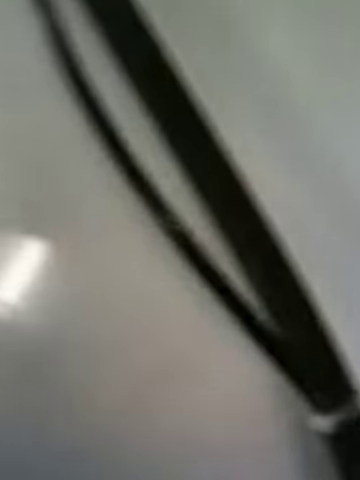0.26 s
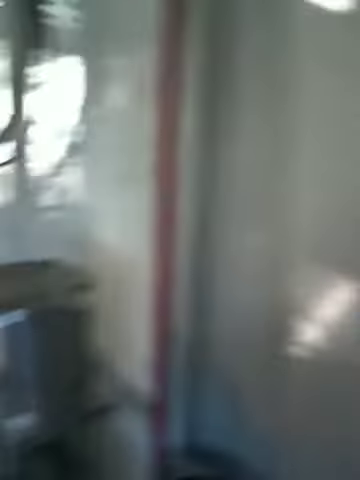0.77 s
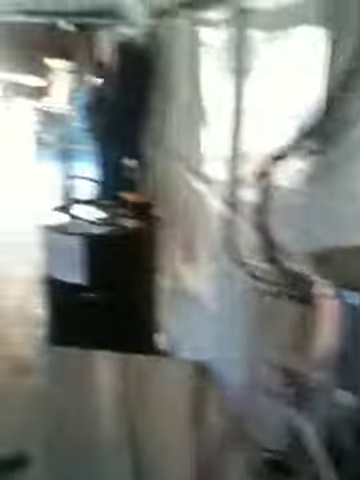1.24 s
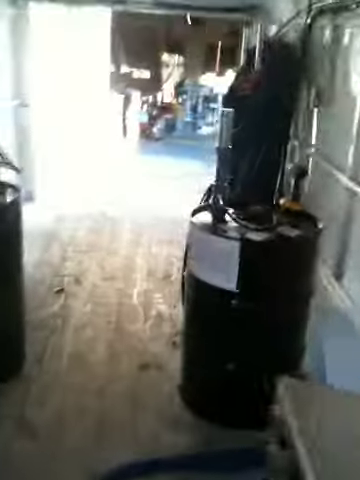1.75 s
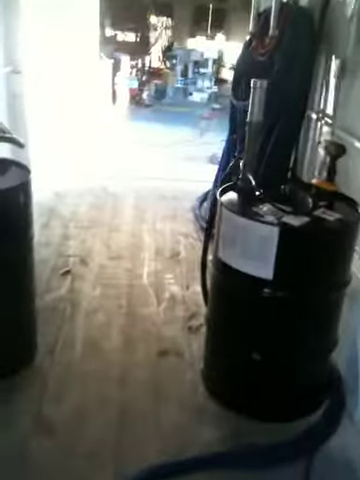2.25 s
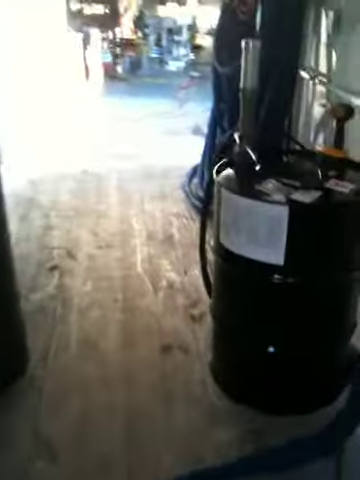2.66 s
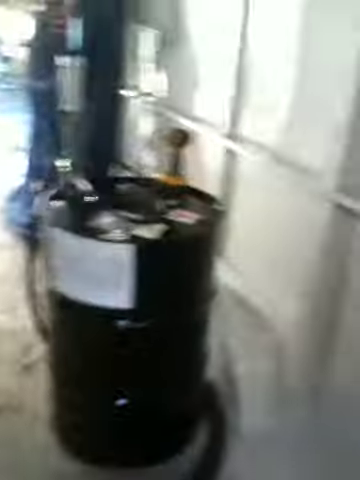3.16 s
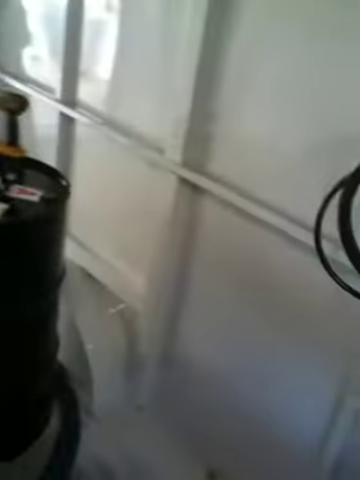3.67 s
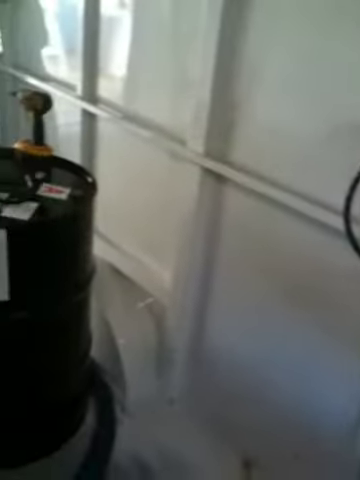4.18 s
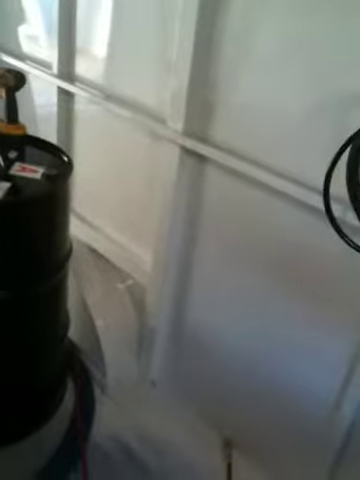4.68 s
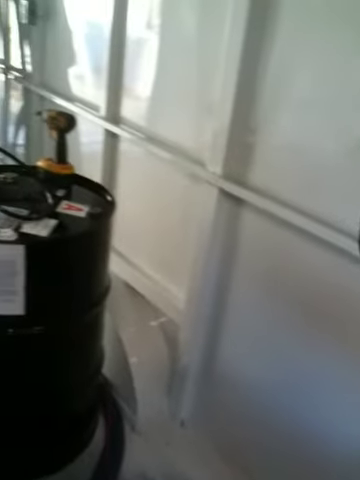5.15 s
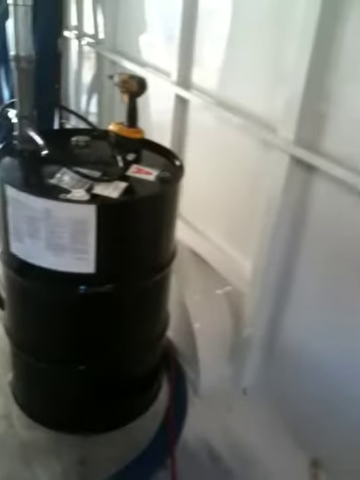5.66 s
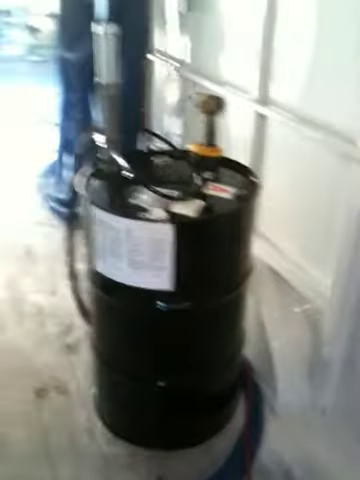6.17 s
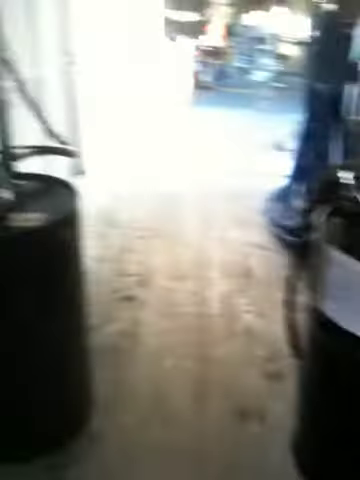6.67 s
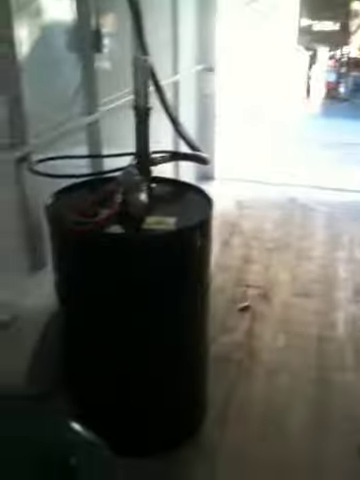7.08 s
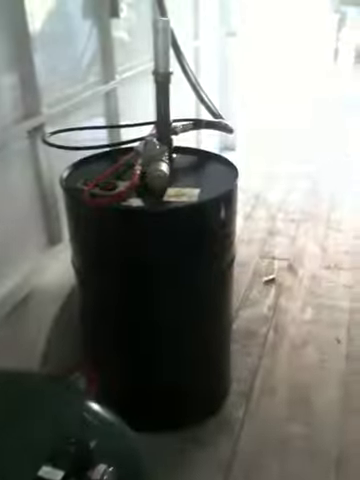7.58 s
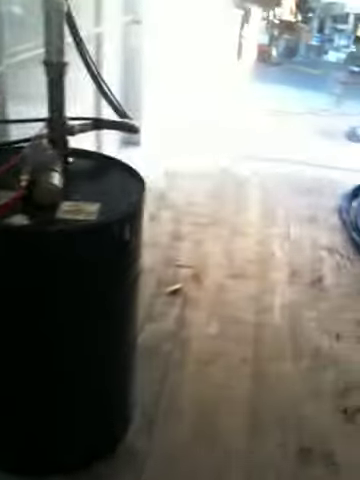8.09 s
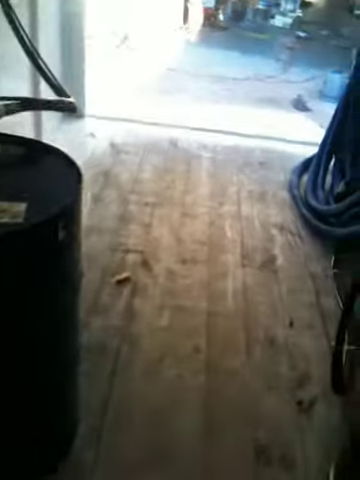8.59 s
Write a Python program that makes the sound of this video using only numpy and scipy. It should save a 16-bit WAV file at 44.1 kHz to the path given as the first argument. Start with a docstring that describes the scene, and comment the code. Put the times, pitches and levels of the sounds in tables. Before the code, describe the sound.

A diesel engine drives a piston air compressor and fan inside a hard-walled trailer. It begins as a loud, bright, rattling roar that overloads a small handheld microphone. Just before two seconds it drops abruptly, bursts back, drops again, returns for a moment around three seconds, then remains a much quieter, muffled hum with a faint pulsing valve hiss.

```python
"""A diesel engine drives a piston air compressor and a fan by belt beside a hard-walled trailer.
Engine and compressor are sums of shaft orders, the fan sums blade tones; shaped noise adds rush and valve hiss.
The din switches between loud and bright, overloading the input, and quiet and dull,
a hum with a trace of valve hiss. The signal also dips out briefly three times."""
import sys
import numpy as np
from scipy import signal
from scipy.fft import rfft, irfft
from scipy.io import wavfile
from scipy.ndimage import uniform_filter1d, map_coordinates

SR = 44100
rng = np.random.default_rng(int(sys.argv[2]) if len(sys.argv) > 2 else 0)


def store_wav(level_fs):
    """Save 16-bit WAV to argv[1]."""
    pcm = np.round(np.clip(np.atleast_2d(level_fs), -1, 1) * 32767)
    wavfile.write(sys.argv[1], SR, pcm.T.astype(np.int16))


N = 389382

# Engine speed, one cycle being two crank turns. Each row: time in seconds, cycle rate in Hz.
SPEED = [(0, 15.04), (.75, 15.048), (1.5, 15.004), (2, 15.003), (2.5, 15.02), (3.4, 14.982), (4, 15.0),
         (4.5, 15.002), (5, 15.02), (6, 15.043), (7, 15.031), (8, 15.016), (8.83, 15.005)]
CYCLE_HZ = SPEED[0][1]  # the rate at the start, used to place orders on the frequency axis
PUMP_RATIO = .8376  # compressor turns per engine cycle


def gain_of(db):
    """Level law: decibels to an amplitude factor."""
    return 10 ** (np.asarray(db) / 20)


def evened(x):
    """Normalization: scales to rms 1."""
    return x / np.sqrt(np.mean(x ** 2) + 1e-20)


def read(points, hz):
    """Spectral envelope: interpolates a curve on a log-frequency axis."""
    f, value = np.transpose(points)
    return np.interp(np.log(hz + 1), np.log(f + 1), value)


def columns(table, t):
    """Time-varying control: interpolates every column of a table at the times t."""
    s, *cols = np.transpose(table)
    return [np.interp(t, s, c) for c in cols]


def band_rms(x, lo_hz, hi_hz):
    """Parseval's theorem: rms of one band from its spectrum."""
    hz = np.fft.rfftfreq(len(x), 1 / SR)
    band = rfft(x)[(hz > lo_hz) & (hz < hi_hz)]
    return np.linalg.norm(band) * np.sqrt(2) / len(x)


def tilted(x, curves, shares):
    """Time-varying filtering: a level for all bins, plus each further curve by its share over frequency."""
    hz, t, z = signal.stft(x, SR, nperseg=256)
    level_db, *tilts_db = curves(t)
    db = level_db + sum(np.outer(read(share, hz), tilt) for share, tilt in zip(shares, tilts_db))
    return signal.istft(z * gain_of(db), SR, nperseg=256)[1][:N]


def rush(spectrum, patchy_db):
    """Broadband noise: Gaussian bins under a spectral envelope, with drifting patches, rms 1."""
    frames, hz = N // 512 + 5, np.fft.rfftfreq(2048, 1 / SR)
    real, imag, patches = rng.standard_normal((frames, len(hz), 3)).T
    patches = uniform_filter1d(patches, size=14, axis=0)  # smooth over frequency
    patches = evened(uniform_filter1d(patches, size=8, axis=1))  # smooth over time
    db = read(spectrum, hz)[:, None] + patchy_db * patches
    z = (real + 1j * imag) * gain_of(db)
    return evened(signal.istft(z, nperseg=2048, noverlap=1536)[1][:N])


def drone(turns, orders, wander_db, drift):
    """Fourier series at shaft speed; the level and phase of each order wander slowly."""
    k, db = np.transpose(orders)
    step, size = 2048, 4096  # samples between wave shapes, points in one shape
    noise = rng.standard_normal((2, N // step + 2, len(k)))
    wander, slip = uniform_filter1d(noise, size=8, axis=1)
    phase = 2 * np.pi * rng.random(len(k)) + drift * np.cumsum(evened(slip), axis=0)
    spectra = np.zeros((len(phase), size // 2 + 1), complex)
    spectra[:, np.round(k).astype(int)] = gain_of(db + wander_db * evened(wander)) * np.exp(1j * phase)
    waves = irfft(spectra) * size / np.sqrt(2)
    waves = np.hstack([waves, waves[:, :1]])  # close the turn for interpolation
    return map_coordinates(waves, [np.arange(N) / step, turns % 1 * size], order=1)


def fan(cycles):
    """Blade passing: harmonics of the blade rate, which swell and sink a little."""
    # Blade tones. Each row: multiple of the blade rate, level in dB.
    blade_tones = [(1, -3), (2, -11), (3, -18), (4, -23)]
    blade_passes = 22.745 * cycles
    swell = rng.standard_normal((len(blade_tones), N))
    swell = evened(uniform_filter1d(swell, size=SR // 3, axis=1))
    return sum(gain_of(db + 3.2 * s) * np.sqrt(2) * np.sin(2 * np.pi * k * blade_passes)
               for (k, db), s in zip(blade_tones, swell))


def compressor(cycles, wander_db, drift):
    """Periodic pumping: a harmonic series on the compressor crank."""
    # Crank orders. Each row: multiple of the crank rate, level in dB.
    crank_orders = [(7, -21), (8, -19), (9, -11), (10, -18), (13, -5), (14, -12), (15, -16), (16, -12),
                    (17, -17), (19, -13), (20, -7), (21, -3), (25, -13), (26, -5), (28, -10), (29, -14),
                    (32, -16), (33, -17), (34, -11), (35, -18), (39, -16), (40, -17), (41, -14), (50, -18),
                    (53, -21), (59, -20)]
    return drone(cycles * PUMP_RATIO, crank_orders, wander_db, drift)


def valves(turns):
    """Modulated flow noise: puffs of air at fixed places of each turn, over a steady leak, of uneven strength."""
    # Valve puffs. Each row: place in the turn (0-1), level in dB, decay in turns.
    puffs = [(.855, 0, .1), (.105, 1, .11), (.29, -10, .1)]
    # Hiss spectrum. Each row: frequency in Hz, density in dB per Hz.
    hiss_spectrum = [(7000, -25), (10400, -21), (11500, 2), (12600, 7), (13400, -14), (14200, 2.5),
                     (15300, 1.5), (16500, -18)]
    flow = np.full(N, .3)
    strength = gain_of(1.2 * rng.standard_normal((int(turns[-1]) + 3, len(puffs))))
    for i, (place, db, decay) in enumerate(puffs):
        since = turns - place + 1
        attack = np.minimum(since % 1 / 0.015, 1)
        shape = np.exp(-(since % 1) / decay) * attack
        flow += gain_of(db) * shape * strength[since.astype(int), i]
    return evened(flow * rush(hiss_spectrum, patchy_db=1.5))


def panel_ring(x):
    """Resonance: a panel rings near 1.75 kHz by a varying amount."""
    # Ring over time. Each row: time in seconds, level in dB, ring in dB before its share.
    ring = [(0, 0, 0.5), (.9, 0, -0.5), (1.3, 0, 2.5), (1.9, -0.5, 2), (2.3, 0, 5), (3.3, 0, 4.5),
            (4, 0, 0)]
    # Resonance shape. Each row: frequency in Hz, share of the ring.
    resonance = [(1450, -0.075), (1740, 0.95), (2100, -0.23), (2500, -0.092)]
    return tilted(x, lambda t: columns(ring, t), [resonance])


def muffling(t, top=False):
    """Attenuation: the loss in dB falls steadily as the sound brightens, jumps as it dulls, then grows on."""
    # Bright spells. Each row: fully bright in seconds, fall of the loss in dB per second before it,
    # start of dulling in seconds, quick part in seconds, fade from that start in dB per second,
    # delay of the top in seconds.
    spells = [(-1, 9000, 1.784, 0.021, 300, 0), (1.9314, 9003, 2.652, 0.038, 203, 0.00098),
              (3, 335, 3.13, 0.022, 165, 0.011)]
    quick_db = 12.5  # quick loss as the sound dulls
    bright, speed, dull, quick, fade, lag = np.transpose(spells)[:, :, None]
    after = np.maximum(t - dull, 0)
    brightening_loss = speed * np.maximum(bright + top * lag - t, 0)
    dulling_loss = quick_db * np.minimum(after / quick, 1) + fade * after
    return (brightening_loss + dulling_loss).min(axis=0)


def bright_colour(t):
    """Spectral shading: the bright colour less the muffling, and how far bass and top are shifted (0-1)."""
    # Colour while bright. Each row: time in seconds, level in dB, then bass, bite and treble shifts
    # in dB before their shares.
    colour = [(0, -15, -0.5, 2, 0.5), (.3, -13, -1.5, -1.5, 0), (.7, -14, -0.5, 3.5, -2),
              (1.3, -13, -1, 1, -2), (1.77, -13.5, 0.5, 6, 0), (1.96, -14, 1, 2.5, -1),
              (2.09, -13.5, 2, 2.5, 0), (2.15, -14, 2.5, 9.5, 1), (2.45, -13.5, 2.5, 11, -2.5),
              (2.58, -12, -0.5, 9.5, -6.5), (2.66, -13, 3, -2, -12.5), (3, -13.5, 2, 7, 4.5),
              (3.06, -17.5, 3.5, -1, 4), (3.13, -14.5, 3.5, 3, 3)]
    level_db, *shifts_db = columns(colour, t)
    loss_db = muffling(t)
    spared = np.minimum(loss_db / 13.5, 1)  # full at a loss of 13.5 dB
    dulled = np.minimum(muffling(t, top=True) / 9.5, 1)  # full at a loss of 9.5 dB
    return [level_db - loss_db, *shifts_db, spared, dulled]


def engine_orders(weak, strong, count):
    """Order spectrum: a scattered smooth level from the fourth order up, with the strong ones set in."""
    k = np.arange(4, count + 1)
    scatter = 3 * rng.uniform(-0.91, 1, len(k)) * np.sqrt(3)  # dB
    db = read(weak, k * CYCLE_HZ) + scatter
    return sorted({**dict(zip(k, db)), **dict(strong)}.items())


def bright_engine(cycles, bright_orders, dull_orders):
    """Order spectrum in two balances: the order levels change at 1.9 s."""
    # Dull balance against bright. Each row: frequency in Hz, level in dB before 4.5 dB more.
    dull_balance = [(75, 7), (170, 0.5), (300, -2), (500, -6.5), (900, -7), (1300, -17), (1750, -13)]
    change_s = 1.9
    later_orders = [(k, db - read(dull_balance, k * CYCLE_HZ) - 4.5) for k, db in dull_orders]
    later_orders += [row for row in bright_orders if row[0] > later_orders[-1][0]]
    before = drone(cycles, bright_orders, wander_db=3.0, drift=0.095)
    after = drone(cycles, later_orders, wander_db=3.5, drift=0.092)
    return np.where(np.arange(N) < change_s * SR, before, after)


def dull_hum(cycles, hiss, dull_orders):
    """Low-frequency emphasis: the quiet, dull mix of all sources, with a trace of valve hiss."""
    # Dull rush and rattle. Each row: frequency in Hz, density in dB per Hz.
    rush_spectrum = [(30, -36), (60, -22), (160, -7), (350, -6), (450, -11.5), (1100, -11), (1350, -23),
                     (1700, -16.5), (2300, -19), (3200, -20), (4300, -25), (7000, -28), (10600, -40),
                     (12300, -41.5), (16000, -46)]
    # Hum over time. Each row: time in seconds, hum level in dB, treble shift in dB before its share,
    # valve hiss level in dB.
    hum_levels = [(1.83, -29, -5, -66), (2.8, -30.5, -4, -63), (3.3, -31, -2.5, -69), (4.1, -34, 0.5, -66),
                  (6.2, -34.5, 0.9, -66), (7.1, -35, 2, -60), (7.5, -34.5, 1.5, -59), (8.3, -35, 1.1, -65),
                  (8.83, -35, 1.1, -67.5)]
    hum = gain_of(4.5) * rush(rush_spectrum, patchy_db=0.44)
    hum = hum + drone(cycles, dull_orders, wander_db=2.5, drift=0.034)
    hum = hum + compressor(cycles, wander_db=-0.2, drift=0.026)
    hum = panel_ring(hum + fan(cycles))
    hum = hum / band_rms(hum, 100, 1200)
    treble = [(1200, 0.064), (2500, 0.53)]  # (Hz, share)
    hum = tilted(hum, lambda t: columns(hum_levels, t), [treble])
    hiss_db = columns(hum_levels, np.arange(N) / SR)[-1]
    return hum + gain_of(hiss_db) * hiss


def bright_din(cycles, hiss, bright_orders, dull_orders):
    """Broadband radiation: the loud, bright mix of all sources, whose bass, bite and treble shift."""
    # Bright rush and rattle. Each row: frequency in Hz, density in dB per Hz.
    rush_spectrum = [(25, -31), (64, -25), (100, -17), (150, -16), (250, 0), (480, -4), (900, -6.5),
                     (1300, -5.5), (2000, -5), (2400, -5.5), (3150, -4), (4600, -12.5), (8000, -15),
                     (12000, -19.5), (16000, -28)]
    # Bass spared by the muffling. Each row: frequency in Hz, gain in dB at full effect.
    spared = [(350, 12), (700, 6), (1300, 2)]
    # Top dulled by the muffling. Each row: frequency in Hz, gain in dB at full effect.
    dulled = [(2000, 0.5), (2700, -4.5), (5000, -12), (8000, -19)]
    din = gain_of(13.5) * rush(rush_spectrum, patchy_db=1.5)
    din = din + bright_engine(cycles, bright_orders, dull_orders)
    din = din + gain_of(-4) * fan(cycles)
    din = din + gain_of(-6) * compressor(cycles, wander_db=4.0, drift=0.074)
    din = panel_ring(din)
    din = din / band_rms(din, 1200, 4000)
    # shares of each shift: (Hz, share)
    bass = [(700, 0.95), (1200, 0.03)]
    bite = [(2300, 0), (3200, 0.24), (5400, 0.77), (7500, 0.077)]
    treble = [(5300, 0.12), (7500, 0.99)]
    return tilted(din + gain_of(-16) * hiss, bright_colour, [bass, bite, treble, spared, dulled])


def scene():
    """Superposition: the bright din and the dull hum add."""
    # Smooth level of the weak engine orders, bright and dull. Each row: frequency in Hz, level in dB.
    bright_weak = [(60, -42), (110, -30), (150, -9), (300, -13), (450, -14), (800, -10), (1300, -13),
                   (2250, -12.5)]
    dull_weak = [(60, -32), (100, -18), (200, -10), (350, -19), (550, -14.5), (900, -19.5), (1200, -23.5),
                 (1750, -25.5)]
    # Orders that stand out, bright and dull. Each row: multiple of the cycle rate, level in dB.
    bright_strong = [(5, -17), (10, -6), (11, -9), (12, -6), (15, -4), (16, -2), (20, -6), (21, -6),
                     (24, -7), (25, -2), (30, -8), (34, -7), (37, -3), (40, -3), (46, -3), (48, -6),
                     (57, -4), (58, -5), (74, -4), (94, -4), (99, -4), (109, -5), (114, -1), (115, -6),
                     (119, -6), (135, -2), (139, -6), (143, -5)]
    dull_strong = [(5, -10), (8, -5), (10, -8), (11, 0), (12, -6), (20, -5), (25, -4), (30, -9), (32, -6),
                   (37, -10), (46, -11), (49, -10), (55, -10), (58, -8), (59, -11), (64, -11), (71, -14),
                   (74, -17), (86, -19), (103, -15), (114, -17)]
    cycles = np.cumsum(columns(SPEED, np.arange(N) / SR)[0]) / SR
    hiss = valves(cycles * PUMP_RATIO)
    bright_orders = engine_orders(bright_weak, bright_strong, count=150)
    dull_orders = engine_orders(dull_weak, dull_strong, count=115)
    mono = bright_din(cycles, hiss, bright_orders, dull_orders) + dull_hum(cycles, hiss, dull_orders)
    return np.tile(mono, (2, 1))


def record(dry):
    """Saturation and band limiting: the input rounds off loud peaks, dips out briefly, and loses the top."""
    # Dips. Each row: start in seconds, end in seconds, depth in dB once the ramps have run their full length.
    dips = [(1.9137, 1.931, -67), (1.9384, 1.945, -28), (3.18, 3.189, -22)]
    ceiling, knee, edge_hz, ramp_s = 0.64, 8.0, 15770, 0.0044
    x = dry / (1 + abs(dry / ceiling) ** knee) ** (1 / knee)
    x = signal.sosfilt(signal.butter(1, 30, "high", fs=SR, output="sos"), x)  # small capsule, no deep bass
    t = np.arange(N) / SR
    for start, end, db in dips:
        inside = np.clip(np.minimum(t - start, end - t) / ramp_s, 0, 1)
        x = x * gain_of(db * inside)
    lowpass = signal.firwin(1023, edge_hz, window=("kaiser", 9), fs=SR)
    return signal.oaconvolve(x, lowpass[None], "same")


dry = scene()
out = record(dry)
store_wav(out)
```